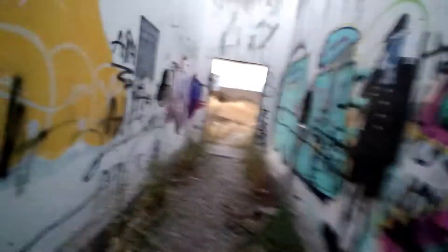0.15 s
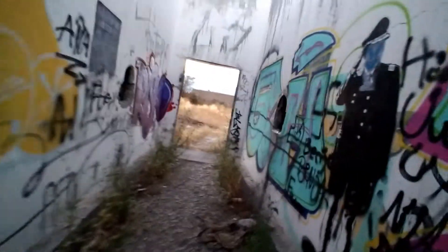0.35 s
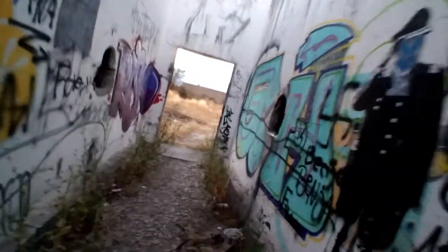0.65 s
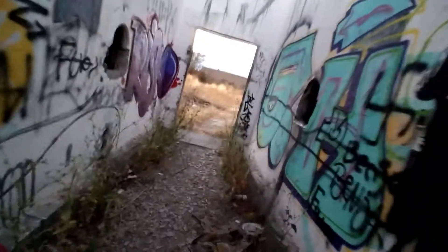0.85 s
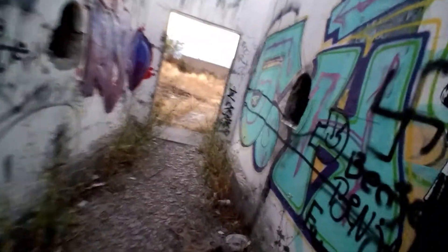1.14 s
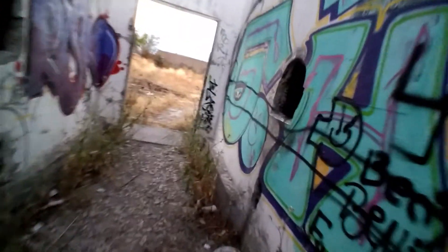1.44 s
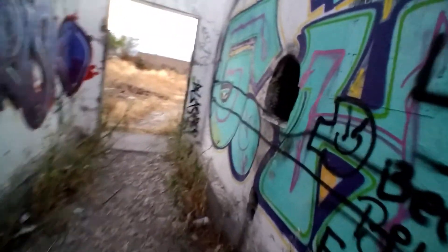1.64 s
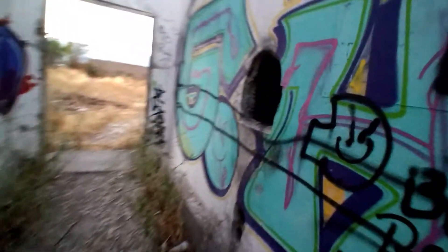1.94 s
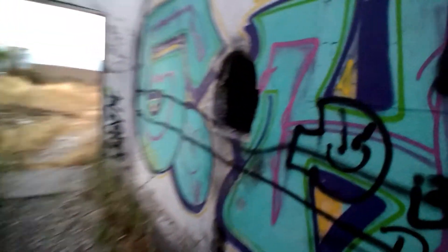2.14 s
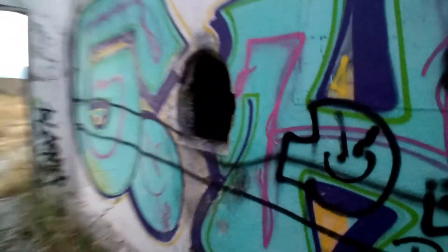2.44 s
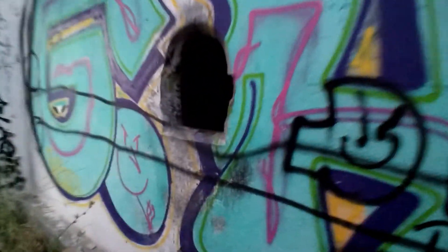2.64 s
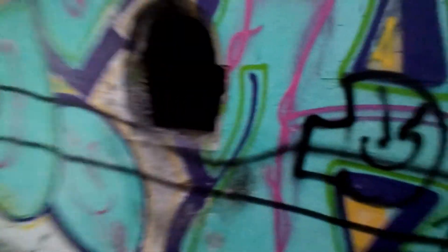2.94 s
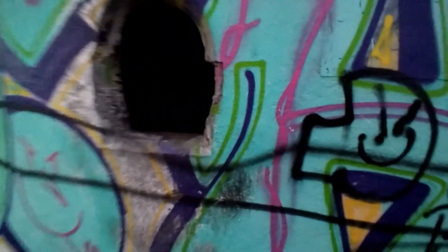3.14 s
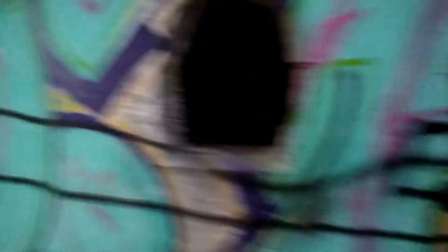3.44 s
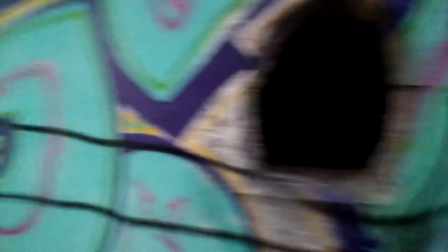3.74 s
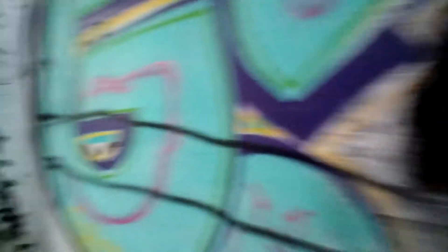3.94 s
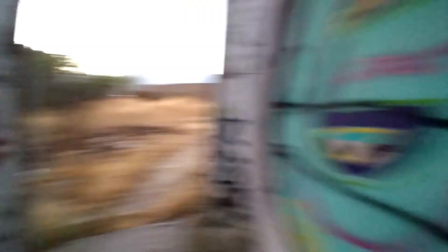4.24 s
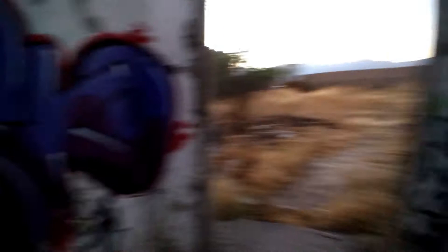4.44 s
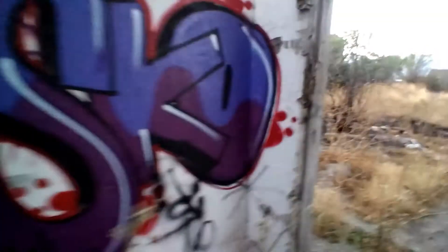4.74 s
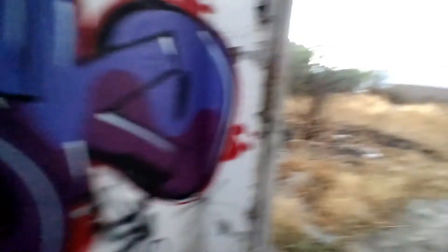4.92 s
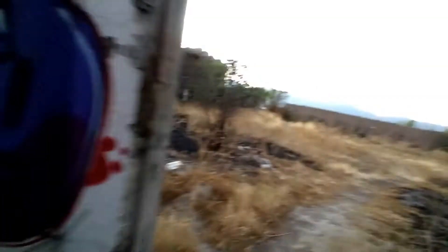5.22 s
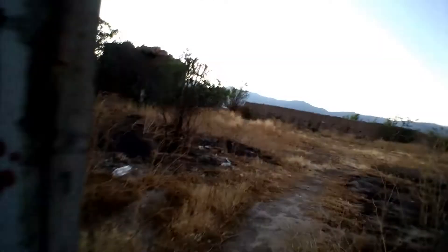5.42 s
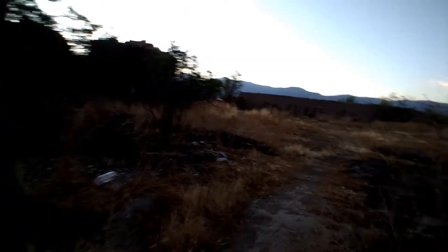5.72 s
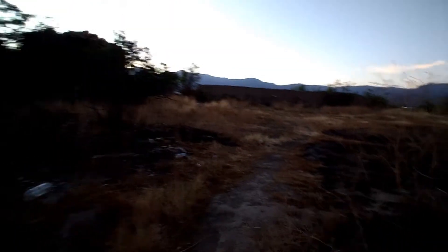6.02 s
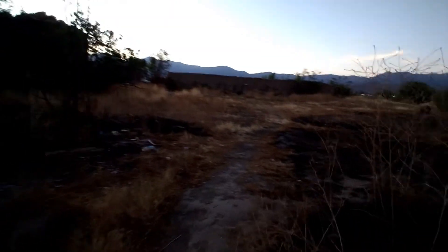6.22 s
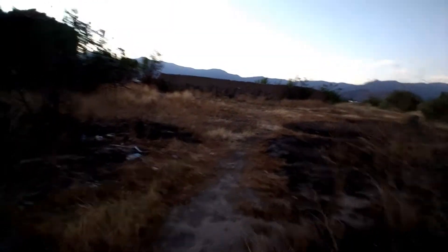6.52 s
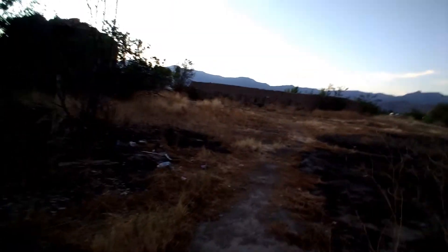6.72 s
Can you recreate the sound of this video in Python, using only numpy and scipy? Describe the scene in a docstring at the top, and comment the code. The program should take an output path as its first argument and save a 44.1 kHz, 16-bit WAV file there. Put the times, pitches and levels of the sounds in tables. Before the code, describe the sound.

Slow, uneven footsteps crunch and grind over gravel and broken rubble between bare echoing walls, then drag out onto a dry grassy path.

```python
"""Footsteps on rubble, from a ruin to a path

Slow, uneven steps cross gravel and broken rubble in a roofless ruin, then a dry path beyond a doorway.
Stones snap and knock in bursts of tiny fractures, slabs and pebbles ring, and grain beds grind underfoot.
Dry grass and trouser legs hiss in smooth noise swells; a small tag on the clothing rings in short modes.
Bare walls answer with scattered echoes, a faint hollow tone rises and falls, and a soft breeze opens up."""
import sys
import numpy as np
from scipy import signal
from scipy.fft import rfft, irfft, next_fast_len
from scipy.io import wavfile
from scipy.ndimage import uniform_filter1d, map_coordinates

SR = 44100
rng = np.random.default_rng(int(sys.argv[2]) if len(sys.argv) > 2 else 0)


def master_out(mix):
    """Clip the mix to full scale and print it as 16-bit PCM to the path in sys.argv[1]."""
    frames = np.transpose(np.atleast_2d(mix))
    ceiling = np.clip(frames, -1, 1)
    pcm = np.round(ceiling * 32767).astype(np.int16)
    wavfile.write(sys.argv[1], SR, pcm)


N = 302967

# Spectrum of the still air. Each row: frequency in Hz, relative density in dB per Hz.
AIR_SPECTRUM = [(25, -16), (100, 2), (250, -4.5), (600, -8), (1200, -9), (1550, -4.5), (1900, -12),
                (6000, -21), (7500, -14), (9000, -21.5), (16000, -24.5)]
AIR_DB = -69  # rms
# Spectrum of the breeze. Each row: frequency in Hz, relative density in dB per Hz.
BREEZE_SPECTRUM = [(150, -30.5), (400, -6.5), (700, 8), (1100, -19), (1450, -16.5), (1700, -6.5),
                   (2000, -30.5), (8000, -46)]
# The breeze opening up beyond the doorway. Each row: time in seconds, mean level in dB.
BREEZE_LEVEL = [(4.6, -93), (5.25, -62), (6.1, -54.5), (6.68, -50.5), (6.87, -57)]
# A faint hollow tone. Each row: resonance in Hz, width in Hz, relative level in dB.
MOAN_RESONANCES = [(477, 45, -63), (924, 92, -62.5)]
# Rise and fall of that tone. Each row: time in seconds, gain in dB.
MOAN_GAIN = [(2.85, -46.5), (2.97, -1.5), (3.09, -10), (3.13, 3.5), (3.27, -7), (3.4, -5), (3.5, -45)]
# What the walls are sent. Each row: time in seconds, gain in dB.
WALL_SEND = [(0, -15), (1.7, -14), (2.1, -16.5), (3.6, -16), (4.6, -35.5), (5.5, -19.5), (6.87, -19.5)]
# Trouser legs and grass sweeping past. Each row: middle in seconds, half length in seconds, level in dB.
LEG_SWINGS = [(0.233, 0.074, -55), (0.365, 0.074, -47.5), (0.77, 0.097, -50), (0.97, 0.12, -56.5),
              (3.152, 0.064, -68.5), (2.815, 0.043, -43.5), (4.509, 0.038, -47.5), (4.758, 0.043, -48.5),
              (4.915, 0.069, -46.5)]
# Spectrum of that hiss. Each row: frequency in Hz, relative density in dB per Hz.
SWISH_SPECTRUM = [(900, -9.5), (2000, -9.5), (3000, -5.5), (4500, -2), (6000, -2.5), (9000, 3.5),
                  (12000, -2), (13500, -8.5), (16000, -19.5)]
# Taps of the tag on the clothing. Each row: start in seconds, level over 10 ms in dB.
TAG_TAPS = [(0.0508, -33.5), (0.165, -44), (0.9053, -37), (.945, -44), (2.796, -38), (2.8487, -45),
            (2.861, -40), (2.9314, -41.5), (3.419, -40), (3.533, -34.5), (3.708, -43), (3.7185, -47),
            (3.737, -45.5)]
# Modes of the tag. Each row: frequency in Hz, mean relative level in dB, 60 dB decay time in seconds.
TAG_MODES = [(2990, -5, .009), (4040, -8, 0.0095), (4770, -2.5, .006), (5440, 0.5, 0.003),
             (7360, -1.5, .007), (8170, 2, 0.0035), (10240, -2, 0.0046), (12100, -3, 0.0046),
             (14500, -15, 0.0065)]
# Feet coming down on earth. Each row: time in seconds (half a THUD_S after the onset), level in dB.
FOOT_THUDS = [(1.619, -53.5), (2.734, -60.5), (2.878, -54), (3.159, -64.5), (3.387, -62.5), (3.532, -58),
              (3.71, -55.5), (4.159, -49.5), (4.32, -52.5), (4.527, -50.5), (5.471, -56), (5.641, -56),
              (6.215, -60.5)]
THUD_S = 0.0327  # from onset to peak
# Soft scuffs and faint puffs.
# Each row: time in seconds, pitch in Hz, level in dB, time from onset to peak in seconds.
SOFT_PUFFS = [(1.872, 510, -51.5, 0.01), (3.975, 296, -56, .012), (4.04, 290, -54.5, 0.016),
              (4.0, 1850, -65, 0.067), (4.439, 290, -59, .03), (0.72, 400, -51, 0.027),
              (1.522, 1400, -48, .012), (1.57, 430, -50, 0.018), (1.786, 300, -54.5, 0.023),
              (5.309, 1540, -51, 0.015), (5.881, 280, -55, .03), (6.082, 276, -52.5, 0.028),
              (6.266, 515, -49, 0.036)]
# Spectra of the ground layers. Each row: frequency in Hz, relative density in dB per Hz.
SOIL_SPECTRUM = [(25, -30.5), (60, -27.5), (130, -19), (190, -6), (260, -3), (500, -4), (800, -4),
                 (1700, -8), (2100, -23.5), (3000, -44)]
GRAVEL_SPECTRUM = [(700, -26), (1500, -3), (2100, 1), (2900, 0), (4500, -2.5), (6000, -3.5), (9000, -18.5)]
GRIT_SPECTRUM = [(3500, -13), (6000, -12), (7800, -1), (9200, -2.5), (11000, -5), (13000, -8.5),
                 (15000, -16.5), (16500, -28)]
# Hollow colour of the scraping. Each row: time in seconds, lowest resonance in Hz.
HOLLOW_PITCH = [(.4, 285), (.8, 328), (1.8, 315), (2.35, 300), (2.6, 265), (3.05, 330), (4, 300),
                (4.6, 255), (5.3, 243)]
# Single rolls of a sole indoors, ahead of sag and layer trims.
# Each row: start in seconds, length in seconds, soil in dB, gravel in dB, fine grit in dB.
SOLE_ROLLS = [(-.03, 0.15, -42.5, -56.5, -60.5), (0.141, 0.28, -42.5, -68, -53),
              (0.41, 0.28, -45.5, -60.5, -61.5), (0.668, 0.41, -45, -61, -57.5),
              (1.436, 0.21, -50.5, -58.5, -67), (1.751, 0.09, -52, -64.5, -68.5),
              (2.079, 0.49, -43.5, -54, -57), (2.696, 0.25, -46, -59, -55.5),
              (2.986, 0.23, -62.5, -67.5, -68), (3.467, 0.18, -47.5, -57, -59.5),
              (3.692, 0.075, -48.5, -64, -70.5)]
# A roll takes hold, sags in soil, gravel and grit (the finest fastest), and dies as the foot lifts.
ROLL_ATTACK_S, ROLL_SAG_DB_PER_S, ROLL_RELEASE_S = 0.085, (13.5, 24, 41), 0.013
# Continuous drag through the doorway and along the path, ahead of layer trims.
# Each row: time in seconds, soil in dB, gravel in dB, brushing of grit and grass in dB.
SOLE_DRAG = [(4.1, -86, -104.5, -103.5), (4.15, -55, -53.5, -55.5), (4.31, -47, -64, -62.5),
             (4.55, -47.5, -59.5, -55.5), (4.72, -49, -68, -64), (4.755, -42, -52.5, -51),
             (4.95, -40.5, -47, -48), (5.12, -47, -59.5, -49.5), (5.32, -48, -58.5, -50),
             (5.56, -47.5, -56.5, -46), (5.9, -44.5, -61, -46.5), (6.12, -51, -63, -50),
             (6.3, -47.5, -58.5, -50.5), (6.49, -47.5, -62, -63), (6.56, -53, -65.5, -60),
             (6.63, -61, -78, -65), (6.87, -73, -82, -77)]
# Ringing modes of shards, loose slabs and pebbles.
# Each row: start in seconds, pitch in Hz, level in dB, 60 dB decay time in seconds.
RINGING_MODES = [(0.201, 5630, -6.5, 0.006), (0.201, 9500, -12.5, 0.0092), (0.404, 6680, -32, 0.05),
                 (0.54, 2850, -43, 0.017), (0.54, 8740, -41.5, 0.036), (0.402, 2810, -42, 0.061),
                 (1.814, 1616, -42, .05), (1.856, 2630, -53, 0.091), (1.971, 2575, -30, 0.068),
                 (1.97, 1635, -14.5, 0.013), (1.979, 10250, -23, 0.024), (1.984, 8280, -26.5, 0.11),
                 (2.057, 2460, -19.5, 0.036), (2.059, 2120, -20, 0.054), (2.061, 3840, -20.5, 0.04),
                 (2.151, 1453, -25, 0.045), (2.199, 8260, -32, 0.047), (3.616, 10850, -40, 0.046),
                 (4.326, 10560, -41.5, 0.092), (4.553, 12100, -37.5, 0.081), (4.9687, 10080, -11.5, 0.026),
                 (5.046, 8680, -29, 0.092), (5.223, 10200, -32, 0.058), (5.479, 9150, -20.5, 0.033),
                 (5.586, 3900, -18, 0.016), (5.626, 4240, -32, 0.024)]
# Larger stones giving way; levels are over 10 ms, ahead of the trims in stones().
# Each row: moment of fracture in seconds, knock on the ground in dB, knock pitch in Hz, crack in dB,
# crack pitch in Hz, tick in dB, tick pitch in Hz, crumbling time in seconds.
LARGE_STONES = [(0.184, -45, 540, -58, 4300, -46, 8900, 0.016),
                (0.2005, -34.5, 546, -39, 4300, -30, 7850, 0.0034),
                (0.2073, -35.5, 550, -24.5, 4300, -21, 8200, 0.0064),
                (0.264, -47, 950, -61, 1930, -39, 8540, 0.0017),
                (0.2715, -30.5, 954, -43, 1930, -53, 8300, 0.0042),
                (0.287, -44, 910, -58, 1710, -33, 8200, 0.0042),
                (0.3164, -63, 910, -31.5, 5300, -18.5, 8100, 0.002),
                (0.472, -69, 1030, -50, 1650, -43.5, 7800, 0.0028),
                (0.5105, -41, 1090, -46.5, 2420, -53.5, 7600, 0.0032),
                (0.621, -45.5, 990, -58, 1500, -63, 7900, 0.0072),
                (0.789, -41, 895, -43.5, 1480, -36.5, 9000, 0.0017),
                (0.822, -31.5, 530, -59, 1730, -49, 8300, 0.0047),
                (0.881, -30.5, 538, -60.5, 1580, -42, 8020, 0.01),
                (1.127, -54, 780, -64, 1560, -65, 8000, 0.004),
                (1.4285, -50.5, 380, -54.5, 5200, -59, 9560, 0.004),
                (1.441, -44.5, 390, -46, 5270, -39, 9150, 0.0053),
                (1.4475, -40.5, 390, -44.5, 2580, -42, 9200, 0.0051),
                (1.4705, -53, 370, -51.5, 2560, -41.5, 9800, 0.004),
                (1.4966, -42, 446, -52, 2780, -50, 8700, 0.012),
                (1.5168, -44, 1380, -45.5, 2650, -35.5, 8700, 0.0071),
                (1.5375, -62, 538, -41.5, 3170, -34.5, 8500, 0.008),
                (1.559, -50, 413, -52, 1833, -47, 8340, 0.0067),
                (1.619, -52, 437, -39, 3040, -45, 8550, 0.0081),
                (1.6245, -52, 500, -43.5, 3160, -40, 8560, 0.0035),
                (1.685, -50, 1340, -46.5, 4660, -45, 8600, 0.0058),
                (1.7637, -59, 1400, -56, 1640, -40.5, 8500, 0.0024),
                (1.7705, -45, 1350, -42.5, 1640, -40.5, 8700, 0.0043),
                (1.803, -58, 310, -47.5, 1630, -47.5, 7100, 0.004),
                (1.959, -35.5, 650, -38.5, 2540, -34, 8750, 0.011),
                (1.9694, -24, 633, -21, 2520, -21, 7600, 0.0095),
                (1.987, -37, 660, -30.5, 2170, -28.5, 9140, 0.01),
                (2.058, -31, 1380, -22.5, 2480, -31, 6920, 0.0096),
                (2.0737, -31, 1300, -28, 2230, -28.5, 8530, 0.013),
                (2.111, -35, 393, -52, 1650, -46, 7750, 0.0079),
                (2.144, -37, 1270, -45, 3240, -46, 7700, 0.0039),
                (2.152, -37, 1280, -41.5, 3220, -41, 8300, 0.025),
                (2.527, -49, 1274, -46.5, 2800, -44.5, 8230, 0.0087),
                (2.672, -37, 1215, -40, 1686, -56.5, 6350, 0.016),
                (2.702, -34.5, 407, -45.5, 4870, -44, 9700, 0.021),
                (2.7315, -43, 910, -34, 4860, -35, 8100, 0.0053),
                (2.7338, -40, 884, -37, 5000, -35, 8400, 0.0029),
                (2.744, -43, 1210, -37.5, 3970, -32, 7940, 0.013),
                (2.7635, -37, 1130, -38, 3760, -38, 8060, 0.00073),
                (2.7664, -49, 490, -32, 3800, -27, 8200, 0.00087),
                (2.772, -50, 500, -47, 3980, -36, 8040, 0.0037),
                (2.883, -54, 760, -46.5, 5090, -48, 6570, 0.0065),
                (3.399, -48.5, 960, -49.5, 4730, -44, 8830, 0.025),
                (3.408, -43.5, 956, -49, 4760, -40.5, 8760, 0.034),
                (3.4185, -51.5, 947, -56, 4730, -28.5, 9800, 0.0018),
                (3.5, -35.5, 599, -63, 1520, -61, 7800, 0.0065),
                (3.6175, -47, 970, -52, 1910, -42.5, 8000, 0.0073),
                (4.123, -36.5, 610, -53.5, 1570, -56, 7270, 0.014),
                (4.146, -35.5, 1030, -52, 1520, -48.5, 6800, 0.01),
                (4.167, -30, 1010, -47, 1610, -50.5, 9450, 0.019),
                (4.184, -25.5, 1050, -51, 1640, -59, 8000, 0.012),
                (4.207, -43, 720, -45, 2000, -49, 9600, 0.0068),
                (4.326, -45.5, 467, -47, 2200, -45, 9850, 0.016),
                (4.46, -44.5, 810, -36, 2860, -36.5, 9000, 0.0053),
                (4.795, -38.5, 940, -59, 1890, -34.5, 8900, 0.0093),
                (4.9837, -63, 710, -60, 5090, -12, 8340, 0.00075),
                (4.9858, -46, 740, -42.5, 5080, -23.5, 8900, 0.013),
                (5.301, -65, 1320, -50, 1650, -38, 9000, 0.0056),
                (5.371, -63, 730, -50.5, 4480, -38.5, 9150, 0.0063),
                (5.463, -33, 870, -44, 1710, -48, 8800, 0.011),
                (5.4725, -28, 302, -45, 4306, -49, 8800, 0.004),
                (5.4775, -60, 330, -39.5, 1640, -29, 8800, 0.011),
                (5.494, -23.5, 1285, -35, 1750, -19, 9150, 0.0066),
                (5.5365, -25, 730, -36, 5140, -18, 8430, 0.008),
                (5.588, -43, 583, -36, 4200, -27.5, 9150, 0.008),
                (5.648, -45, 850, -49, 3130, -39.5, 9200, 0.0012),
                (6.16, -43.5, 794, -44.5, 3760, -37.5, 9150, 0.0085),
                (6.215, -35, 423, -44.5, 1600, -39.5, 9250, 0.018),
                (6.373, -33.5, 493, -38.5, 2540, -46, 6960, 0.01),
                (6.42, -34.5, 670, -62, 1660, -46, 8300, 0.0035),
                (6.482, -55, 650, -54, 3630, -40, 8550, 0.0091)]
# Small stones: knock, crack and tick lie this far over the work of the sole, ahead of the same trims.
SMALL_PER_S, SMALL_OVER_DB, SMALL_SCATTER_DB, SMALL_CRUMBLE_S = 15, (0, 3, 8), 3, 0.02
SMALL_BODY_HZ, SMALL_TICK_HZ = (730, 2900), 9100  # knock and crack lie within an octave of these
# Noise suppressor. Each row: frequency in Hz, threshold in dB as the level of a white noise.
SUPPRESSOR_THRESHOLD = [(100, -63), (400, -42), (1200, -49.5), (3000, -63.5), (7500, -68.5), (10000, -45.5),
                        (15000, -54.5)]
TOP_HZ = 15900  # upper edge of the sound


def undb(db):
    """Decibels are logarithmic: 20 dB are a factor of ten in amplitude."""
    return 10 ** (np.asarray(db) / 20)


def curve(table, axis=1):
    """Piecewise-linear motion: one column of a table joined by straight lines over the whole time."""
    rows = np.array(table)
    return np.interp(np.arange(N) / SR, rows[:, 0], rows[:, axis])


def unit(x):
    """Normalisation: scale to rms 1."""
    return x / np.sqrt(np.mean(x ** 2))


def colour(x, points):
    """Spectral shaping: weight x by (Hz, dB) points on a logarithmic axis, at rms 1."""
    hz, db = np.transpose(points)
    size = next_fast_len(N)
    f = np.maximum(np.arange(size // 2 + 1) * SR / size, 1)
    gain = undb(np.interp(np.log(f), np.log(hz), db))
    return unit(irfft(rfft(x, size) * gain, size)[:N])


def band(x, low_hz, high_hz, order=2):
    """Causal band-pass filtering."""
    edges = [low_hz, min(high_hz, SR / 2 - 1000)]
    return signal.sosfilt(signal.butter(order, edges, "band", fs=SR, output="sos"), x)


def resonate(x, hz, width_hz):
    """Single resonance, of gain 1 at its centre."""
    return signal.lfilter(*signal.iirpeak(min(hz, SR / 2 - 1000), hz / width_hz, fs=SR), x)


def walk(rate):
    """Random fluctuation: levels held for 1 / rate seconds and slewed, at rms 1."""
    k = max(int(SR / rate), 1)
    held = np.repeat(rng.standard_normal(N // k + 1), k)
    return unit(uniform_filter1d(held, k)[:N])


def grains(size, rate, scatter_db):
    """Poisson-like impacts at random moments: many weak, a few strong."""
    struck = rng.random(size) < rate / SR
    strength = np.minimum(rng.exponential(size=size), 5)
    return struck * rng.choice([-1, 1], size) * undb(scatter_db * strength)


def add(out, s, x):
    """Superposition: mix x into out from time s."""
    i = max(int(s * SR), 0)
    out[i:i + len(x)] += x[:N - i]


def swell(t, length_s):
    """Soft push: an envelope that peaks at 1 after length_s."""
    return (t / length_s * np.exp(1 - t / length_s)) ** 2


def outdoors():
    """Broadband turbulence: still air, and a breeze whose level fluctuates over the field."""
    breeze = colour(rng.standard_normal(N), BREEZE_SPECTRUM) * undb(curve(BREEZE_LEVEL) + walk(6))
    air = undb(AIR_DB) * colour(rng.standard_normal(N), AIR_SPECTRUM)
    return breeze + air


def moan():
    """Resonance of noise: twice-filtered bands make a faint hollow tone that rises and falls."""
    tone = np.zeros(N)
    for hz, width_hz, db in MOAN_RESONANCES:
        once = resonate(rng.standard_normal(N), hz, width_hz)
        tone += undb(db) * unit(resonate(once, hz, width_hz))
    return tone * undb(curve(MOAN_GAIN))


def walls(x, low_t60=0.59, mid_t60=0.33, high_t60=0.27, low_db=3, high_db=-2, gap_s=0.0093):
    """Reverberation between close plaster walls: scattered reflections that lose their treble first."""
    t = np.arange(SR) / SR
    echoes = unit(grains(SR, rate=3000, scatter_db=4))
    # low edge in Hz, high edge in Hz, 60 dB decay time in seconds, relative level in dB
    parts = (182, 1100, low_t60, low_db), (1380, 5500, mid_t60, 0.012), (5470, 18000, high_t60, high_db)
    tail = np.zeros(SR)
    for low_hz, high_hz, t60, db in parts:
        decay = np.exp(-np.log(1000) * t / t60)
        tail += undb(db) * band(echoes, low_hz, high_hz, order=3) * decay
    tail *= t > gap_s
    return signal.fftconvolve(x, tail / np.sqrt(np.sum(tail ** 2)))[:N]


def swishes(flutter_db=4.0):
    """Friction of fibres too fine to hear singly: a fluttering hiss swells and fades as the leg swings by."""
    t = np.arange(N) / SR
    swing = sum(undb(db) * np.exp(-((t - s) / half_s) ** 2) for s, half_s, db in LEG_SWINGS)
    return swing * undb(flutter_db * walk(41)) * colour(rng.standard_normal(N), SWISH_SPECTRUM)


def taps(scatter_db=4.0, bounce=0.35, bounce_s=0.0057):
    """Modal ringing: the struck tag sounds for a few milliseconds and chatters a little as it settles."""
    out, t = np.zeros(N), np.arange(SR // 50) / SR
    hz, mode_db, t60 = np.transpose(TAG_MODES)[:, :, None]
    sign = (-1) ** np.arange(len(TAG_MODES))[:, None]
    for s, db in TAG_TAPS:
        shape = undb(mode_db + scatter_db * rng.standard_normal(hz.shape)) * sign
        ring = np.sum(shape * np.sin(2 * np.pi * hz * t) * np.exp(-np.log(1000) * t / t60), axis=0)
        chatter = rng.standard_normal(len(t)) * np.exp(-t / bounce_s)
        x = ring + bounce * np.convolve(ring, chatter / np.linalg.norm(chatter))[:len(t)]
        add(out, s, undb(db) * x * np.sqrt(SR / 100 / np.sum(x ** 2)))
    return out


def footfalls():
    """Impact on a soft mass: the earth answers the weight of each foot with a low thud."""
    out, t = np.zeros(N), np.arange(SR // 4) / SR
    for s, db in FOOT_THUDS:
        thud = unit(band(rng.standard_normal(len(t)), low_hz=87.0, high_hz=267))
        add(out, s - THUD_S / 2, undb(db) * thud * swell(t, THUD_S))
    return out


def soft_puffs(spread=0.11):
    """Band-limited noise: narrow bands swell and fade, each at a rough pitch."""
    out, t = np.zeros(N), np.arange(SR // 4) / SR
    for s, hz, db, length_s in SOFT_PUFFS:
        puff = unit(band(rng.standard_normal(len(t)), hz / (1 + spread), hz * (1 + spread)))
        add(out, s - length_s / 2, undb(db) * puff * swell(t, length_s))
    return out


def footwork():
    """Contact force as three gains, for soil, gravel and grit: single rolls, then one long drag."""
    t = np.arange(N) / SR
    work = undb([curve(SOLE_DRAG, axis=1), curve(SOLE_DRAG, axis=2), curve(SOLE_DRAG, axis=3)])
    for s, length_s, *layers_db in SOLE_ROLLS:
        age = np.maximum(t - s, 0)
        release = np.exp(-np.maximum(age - length_s, 0) / ROLL_RELEASE_S)
        contact = np.minimum(age / ROLL_ATTACK_S, 1) * release
        for layer, db, sag in zip(work, layers_db, ROLL_SAG_DB_PER_S):
            layer += contact * undb(db - sag * age)
    return work


def pebbles(low_hz, high_hz, width_hz, rate, count, shift_db=0, shift_s=.09):
    """Many struck resonators: pebbles ring at their own pitches while the load shifts between them."""
    spacing_hz = (high_hz - low_hz) / count
    pitches = np.linspace(low_hz, high_hz, count) + spacing_hz * rng.uniform(-0.48, 0.2, count)
    out = np.zeros(N)
    for hz in pitches:
        load_db = shift_db * rng.uniform(-1, 1, 256)
        moments = rng.integers(0, N, int(rate * N / SR))
        load_index = (moments / SR / shift_s).astype(int) % len(load_db)
        knocks = np.zeros(N)
        knocks[moments] = undb(3.6 * rng.standard_normal(len(moments)) + load_db[load_index])
        out += resonate(knocks, hz, width_hz)
    return unit(out)


def hollow(x, reflect=.6, damp_hz=3000):
    """Comb filtering: short inverted echoes favour odd multiples of a pitch that drifts with the walker."""
    place = np.arange(N) - SR / (2 * curve(HOLLOW_PITCH))  # half a period earlier
    out = echo = x
    for _ in range(3):
        dull = signal.sosfiltfilt(signal.butter(1, damp_hz, fs=SR, output="sos"), echo)
        echo = -reflect * map_coordinates(dull, [place], order=1)
        out = out + echo
    return unit(out)


def tread(work, soil_db=-6.0, gravel_db=-1.66, grit_db=0.0, hiss=1.0):
    """Granular friction: the sole rolls pebbles with a hollow sound and grinds countless small grains."""
    rolling = pebbles(low_hz=184.0, high_hz=1828.0, width_hz=36, rate=110, count=28, shift_db=5)
    soil = hollow(colour(rolling + 0.26 * rng.standard_normal(N), SOIL_SPECTRUM))
    rubbing = unit(grains(N, rate=1500, scatter_db=3))
    chips = pebbles(low_hz=1442, high_hz=6240, width_hz=44, rate=25, count=30)
    gravel = colour(1.3 * chips + rubbing + .5 * hiss * rng.standard_normal(N), GRAVEL_SPECTRUM)
    # dry blades and the finest grains rattle high and briefly
    rattle = pebbles(low_hz=5950, high_hz=15200, width_hz=250, rate=13, count=30)
    grit = colour(0.22 * rattle + rubbing + hiss * rng.standard_normal(N), GRIT_SPECTRUM)
    layers = [soil * undb(soil_db), gravel * undb(gravel_db), grit * undb(grit_db)]
    return np.sum(work * layers, axis=0)


def ringing(rise_s=0.00032, side_db=-13, roughness=0.55):
    """Free vibration: each rings at a pitch with two weaker neighbours, roughened by narrow noise."""
    out, t = np.zeros(N), np.arange(SR // 5) / SR
    for s, hz, db, t60 in RINGING_MODES:
        sides_hz = hz * np.array([rng.uniform(.82, .92), rng.uniform(1.02, 1.07)])
        tone = np.sin(2 * np.pi * hz * t)
        tone += undb(side_db) * np.sin(2 * np.pi * sides_hz[:, None] * t).sum(0)
        tone += roughness * unit(resonate(rng.standard_normal(len(t)), hz, width_hz=340))
        envelope = (1 - np.exp(-t / rise_s)) * np.exp(-np.log(1000) * t / t60)
        add(out, s, undb(db) * tone * envelope)
    return out


def fracture(t, crumble_s, snap=5.8, dust=0.16, brittle_s=0.0017):
    """Brittle failure: grit yields just before t = 0, then a dying shower; quick breaks snap, slow ones crunch."""
    shower = unit(grains(len(t), rate=2800, scatter_db=3.0)) + dust * rng.standard_normal(len(t))
    shower[np.searchsorted(t, 0)] += snap / (1 + (crumble_s / brittle_s) ** 2)
    yielding = np.exp(np.minimum(t, 0) / (crumble_s / 10))
    return shower * yielding * np.exp(-np.maximum(t, 0) / crumble_s)


def body(x, main_hz, low_hz, high_hz, ring, main):
    """Damped body modes: a main resonance and four others at random in the range of the stone."""
    others = low_hz * (high_hz / low_hz) ** ((np.arange(4) + rng.random(4)) / 4)
    modes = [(main_hz, main)] + [(hz, ring) for hz in others]
    return x + sum(gain * resonate(x, hz, 50 + hz / 40) for hz, gain in modes)


def small_stones(work):
    """Load-driven fracture: rows like LARGE_STONES at loose intervals, as strong as the sole presses then."""
    rows = []
    for i, luck in enumerate(rng.random((200, 6))):
        s = (i + luck[0]) / SMALL_PER_S
        if s < (N - 1) / SR:
            pressure_db = 20 * np.log10(work[:, int(s * SR)])
            scatter_db = SMALL_SCATTER_DB * (2 * luck[1:4] - 1)
            knock_db, crack_db, tick_db = pressure_db + SMALL_OVER_DB + scatter_db
            knock_hz, crack_hz = SMALL_BODY_HZ * 2 ** (2 * luck[4:] - 1)
            rows.append((s, knock_db, knock_hz, crack_db, crack_hz, tick_db, SMALL_TICK_HZ, SMALL_CRUMBLE_S))
    return rows


def stones(rows, knock_trim_db=-4.0, crack_trim_db=0, tick_trim_db=-1.85, soil_lag_s=0.00098, reach=2.9):
    """Excited resonance: a fracture thumps the ground, cracks in the stone and ticks at its edges."""
    out, t = np.zeros(N), np.arange(-SR // 100, SR // 10) / SR
    for s, knock_db, knock_hz, crack_db, crack_hz, tick_db, tick_hz, crumble_s in rows:
        burst = fracture(t, crumble_s)
        knock = band(fracture(t, crumble_s + soil_lag_s), low_hz=248, high_hz=1380)
        knock = body(knock, knock_hz, low_hz=361, high_hz=1640, ring=0.53, main=3.0)
        crack = band(burst, low_hz=1600, high_hz=5550, order=3)
        crack = body(crack, crack_hz, low_hz=1406, high_hz=5180, ring=2.7, main=5.3)
        # the higher a tick is pitched, the further it reaches into the treble
        edge_hz = max(11800 * (tick_hz / 8300) ** reach, 9500)
        tick = band(burst, 5800, edge_hz, order=3)
        tick = body(tick, tick_hz, low_hz=5840, high_hz=12550, ring=0.8, main=1.2)
        tick = tick + 1.7 * resonate(tick, tick_hz, width_hz=2400)
        parts = ((knock, knock_db + knock_trim_db), (crack, crack_db + crack_trim_db),
                 (tick, tick_db + tick_trim_db))
        # levels are those of the energy spread over 10 ms
        add(out, s + t[0], sum(undb(db) * x * np.sqrt(SR / 100 / np.sum(x ** 2)) for x, db in parts))
    return out


def scene(tag_echo_db=-7):
    """Superposition of steps, clothing, their echo and the open air."""
    work = footwork()
    hits = stones(LARGE_STONES + small_stones(work)) + ringing() + footfalls() + soft_puffs()
    tag = taps()
    echo = walls((hits + undb(tag_echo_db) * tag) * undb(curve(WALL_SEND)))
    return (hits + tag + echo + tread(work) + swishes() + moan() + outdoors())[None]


def suppress(x, depth_db=-10, size=512):
    """Spectral gating: each narrow band is turned down gradually as it sinks towards and under its threshold."""
    f, _, z = signal.stft(x, SR, nperseg=size)
    power = uniform_filter1d(np.abs(z) ** 2, size=3, axis=-2)  # over neighbouring bands
    power = uniform_filter1d(power, size=5, axis=-1) * size / 1.5  # over time
    hz, db = np.transpose(SUPPRESSOR_THRESHOLD)
    threshold = undb(np.interp(np.log(f + 1), np.log(hz), db))[:, None] ** 2
    gain = np.maximum(power / (power + threshold), undb(depth_db))
    return signal.istft(z * gain, SR, nperseg=size)[1][..., :N]


def record(dry, ceiling=.62):
    """Soft gating of weak bands, soft saturation and a steep low-pass."""
    rounded = ceiling * np.tanh(suppress(dry) / ceiling)
    return signal.sosfilt(signal.ellip(8, .2, 70, TOP_HZ, fs=SR, output="sos"), rounded)


dry = scene()
out = record(dry)
master_out(out)
```